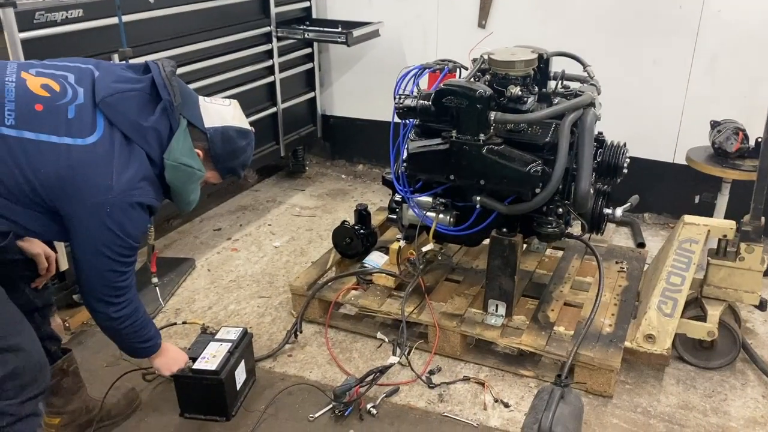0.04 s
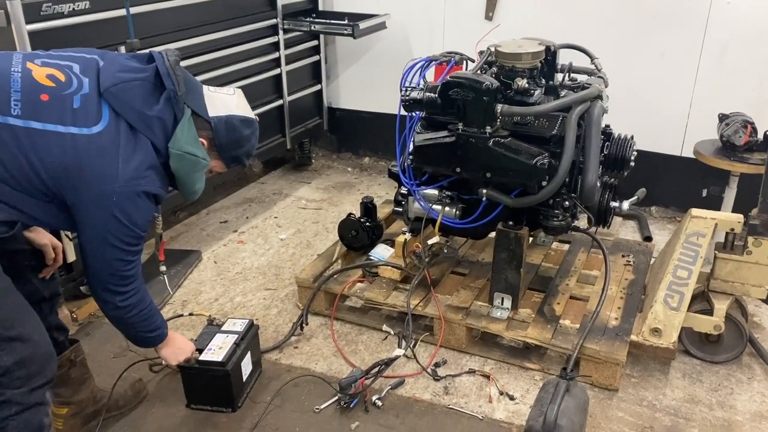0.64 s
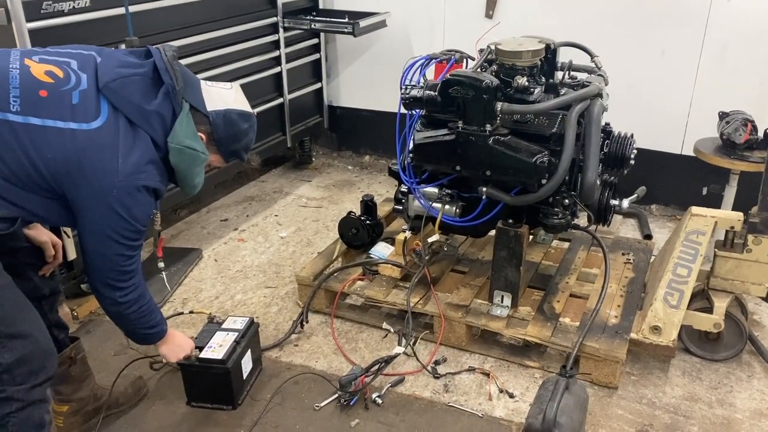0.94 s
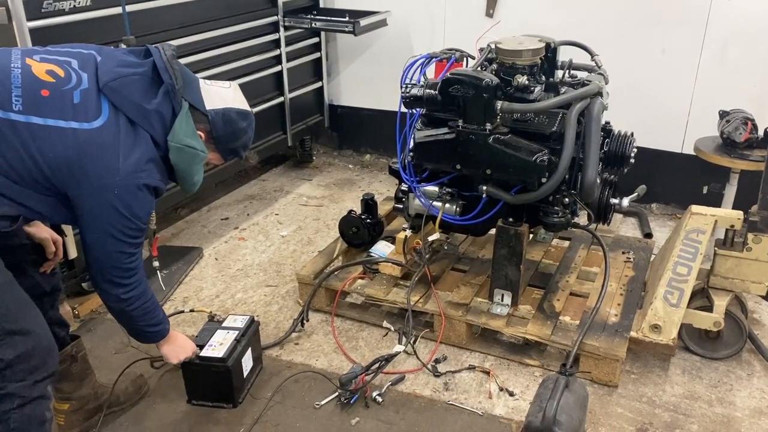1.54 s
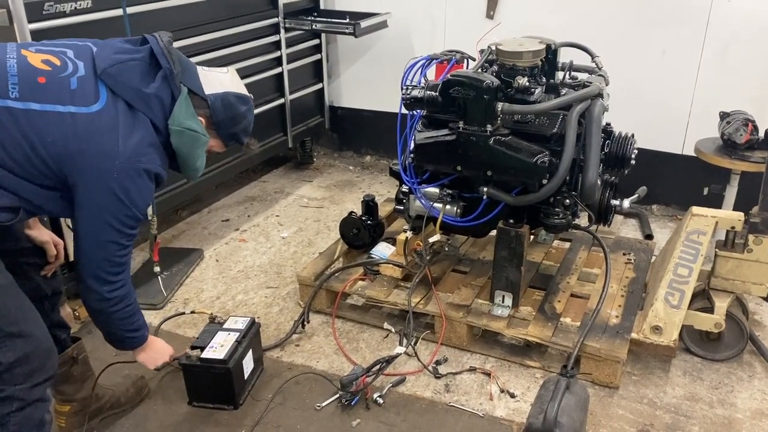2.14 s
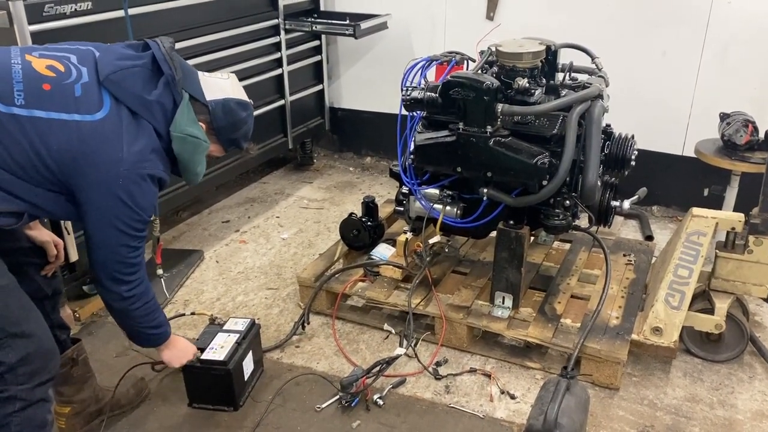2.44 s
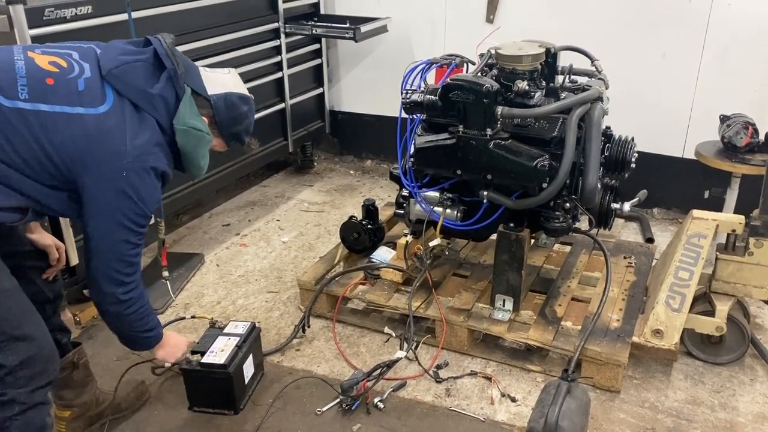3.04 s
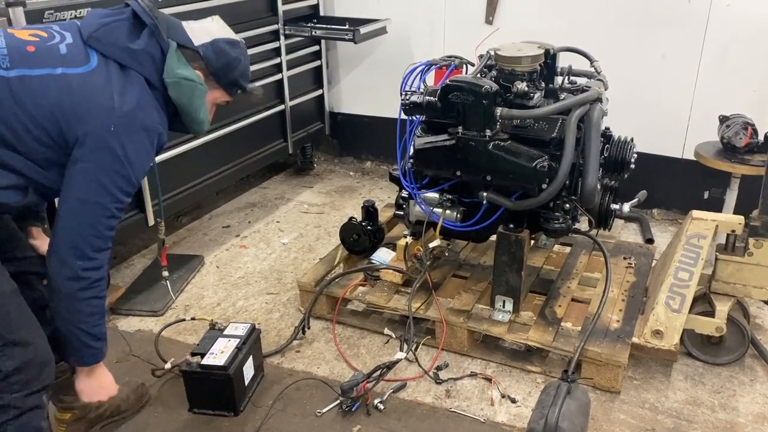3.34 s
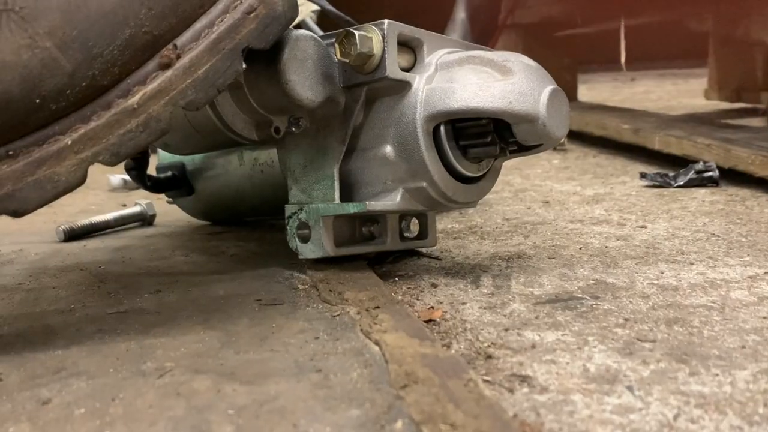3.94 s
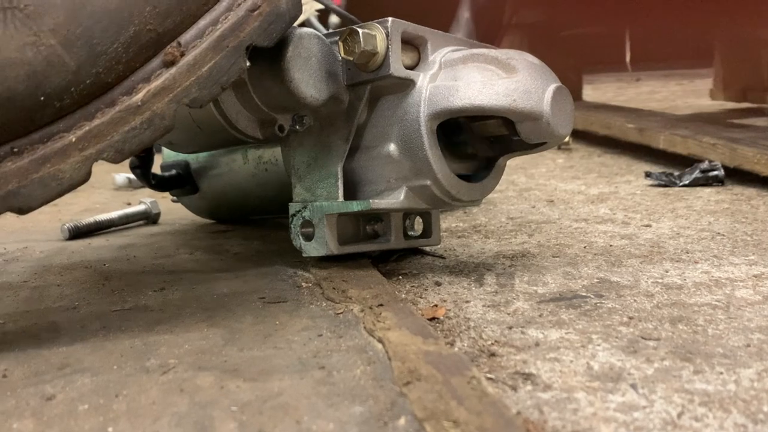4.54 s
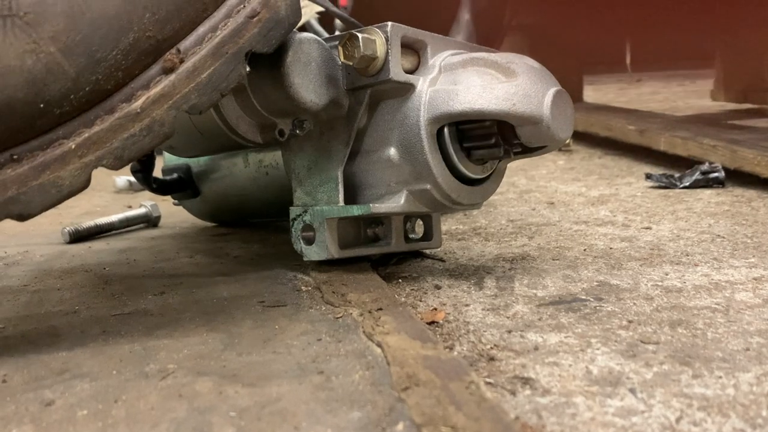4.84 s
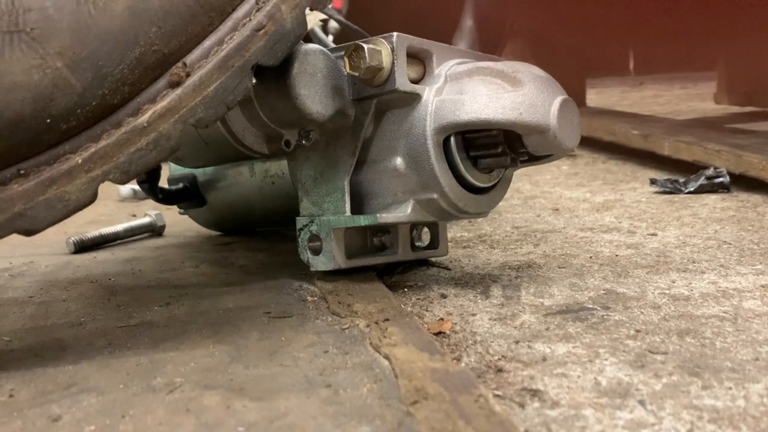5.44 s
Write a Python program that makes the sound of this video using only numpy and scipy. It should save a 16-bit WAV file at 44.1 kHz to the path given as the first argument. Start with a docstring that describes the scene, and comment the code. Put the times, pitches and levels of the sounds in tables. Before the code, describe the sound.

Ringing metal clicks from an engine that will not turn over, followed by close, sharp steel clacks of a starter with brief whirrs.

```python
"""A workshop, microphones a few steps from a boat engine whose starter is jumped from a battery.
Three times the lead sparks on the post, the solenoid slams in, the lead sparks again and it drops out;
block and room ring, but nothing turns. A sleeve swishes and the lead is put down with soft bumps.
Then, close by on the concrete floor, a loose starter: three times its pinion shoots out with a steel
clack and whirrs briefly; the first two times it snaps back on its spring. The room rumbles faintly."""
import sys
import numpy as np
from scipy import signal
from scipy.fft import rfft, irfft, next_fast_len
from scipy.io import wavfile
from scipy.ndimage import uniform_filter1d

SR = 44100
rng = np.random.default_rng(int(sys.argv[2]) if len(sys.argv) > 2 else 0)


def inscribe(sig):
    """Save sig as 16-bit PCM at rate SR to the path in sys.argv[1].

    A 1-D sig is mono; a 2-D sig holds one channel per row.
    Samples are clipped to [-1, 1] before scaling.
    """
    pcm = np.round(np.clip(np.atleast_2d(sig).T, -1, 1) * 32767)
    wavfile.write(sys.argv[1], SR, pcm.astype(np.int16))


N = 247047
T = np.arange(SR) / SR  # the second that follows a blow

# the solenoid on the engine slams in and drops out: time_s, level_db, spark_db
PULL_IN = [(.1150, -15, -32), (1.31, -15.5, -33.5), (2.564, -16.5, -30.5)]
DROP_OUT = [(0.6297, -22, -38), (1.7995, -22.5, -31.5), (2.9318, -22.5, -27.5)]
# the loose starter's pinion hits its stop: time_s, travel_s, level_db, lever_db
THROWS = [(3.8126, .0218, -2, -10), (4.579, .0212, -3.5, -8.5), (5.3237, .0234, -4, -14)]
# the pinion snaps back after the first two throws: time_s, level_db
RETURNS = [(4.193, -10.5), (4.9207, -11.5)]
# spectrum of the starter knocking on concrete: freq_hz, level_db
CONCRETE = [(20, -36), (50, 0), (110, -3), (230, -2.5), (560, -0.5), (950, 0), (1300, -16.5), (1800, -11),
            (3000, -19), (4600, -6), (7000, -18), (10000, -7), (15000, -42.5)]
# how alike the two microphones hear far and near sounds: freq_hz, correlation
ALIKE_FAR = [(100, 0.91), (300, .7), (600, 0), (1200, 0), (2500, .35), (5000, 0.21), (12000, 0.025)]
ALIKE_NEAR = [(100, 1), (900, 0.73), (2500, 0.08), (5000, 0.13), (9000, 0.14), (13000, 0.48)]


def mounted_starter():
    """The starter on the engine and its battery lead, a few steps off and slightly to the right."""
    return (pull_in() + drop_out() + lead_sparks() + lead_bumps()) * amp([[-.5], [.5]])


def pull_in():
    """The solenoid slams its plunger home and the engine rings."""
    # spectra of the crack and the ring: freq_hz, level_db
    crack = [(30, -32.5), (100, -21), (700, -14.5), (1100, -10.5), (1550, -3), (2600, -2), (3200, -11.5),
             (4500, -14.5), (7500, -15), (11400, -19), (13500, -20), (16000, -33)]
    ring = [(25, -41), (70, -27.5), (180, -28.5), (245, -8), (350, -14), (490, -4), (720, -11.5),
            (1100, 1.5), (1700, -2.5), (2600, -4.5), (3200, -16.5), (3650, -8), (4400, -13.5),
            (7500, -17.5), (12000, -19), (15500, -36.5)]
    # narrow resonances in the ring: pitch_hz, width_hz, lift_db
    peaks = [(1100, 35, 3), (2110, 80, 0)]
    return engine_blows(PULL_IN, crack, ring, peaks, crack_db=8.5, rise_s=.0018, hold_s=.002,
                        t60_s=.05, swell_s=.0077, modes_db=-8.5, tilt_db=1.5)


def drop_out(recoil_s=.0117, recoil_db=-14.5):
    """The plunger drops back with a shorter crack; the recoil thuds into the pallet."""
    # spectra of the crack, the ring and the pallet's thud: freq_hz, level_db
    crack = [(100, -15.5), (450, -26.5), (950, -1.5), (1300, -14), (2400, 2), (3000, -14.5), (7500, -12),
             (9300, -3), (13300, -3), (15500, -17)]
    ring = [(25, -36), (60, -15.5), (120, -4), (180, -11), (265, 7.5), (420, -11.5), (750, -5.5),
            (1060, 2.5), (1400, -10.5), (2500, -6.5), (3250, -22), (4300, -14), (8000, -15.5),
            (11000, -2.5), (15000, -28.5)]
    pallet = [(20, -52), (50, -33.5), (85, -9.5), (125, -2), (180, -11.5), (280, -8.5), (400, -25),
              (1000, -43), (4000, -82)]
    # narrow resonances in the ring: pitch_hz, width_hz, lift_db
    peaks = [(1100, 40, 3), (4900, 160, 5)]
    blows = engine_blows(DROP_OUT, crack, ring, peaks, crack_db=7, rise_s=.0021, hold_s=.0043,
                         t60_s=.019, swell_s=.0044, modes_db=-7, tilt_db=-.8)
    recoils = [(s + recoil_s, db + recoil_db) for s, db, _ in DROP_OUT]
    return blows + taps(recoils, pallet, ALIKE_NEAR, hold_s=.011, t60_s=.24)


def engine_blows(blows, crack, ring, peaks, crack_db, rise_s, hold_s, t60_s, swell_s, modes_db, tilt_db):
    """The plunger cracks against its stop; block and room swell up behind it and ring out."""
    # damped resonances of the solenoid case: pitch_hz, width_hz, lift_db
    case = [(1490, 96, 12), (2250, 150, -6.5), (2640, 180, 1.5), (3730, 250, 6.5), (10300, 100, -1),
            (13200, 63, 1.5)]
    out = np.zeros((2, N))
    early = 1 + .56 * np.exp(-T / .029)  # floor and near walls answer first
    for s, db, _ in blows:
        add(out, s, amp(db + crack_db) * burst(crack, ALIKE_FAR, rise_s, hold_s, t60_s, case))
        body = noise(ring, ALIKE_FAR, peaks) * early + amp(modes_db) * block_ring(tilt_db)
        add(out, s, amp(db) * room_decay(body) * (1 - np.exp(-T / swell_s)))
    return out


def block_ring(tilt_db):
    """The block's modes, struck at new strengths each time; tilt is per octave."""
    # modes of the engine block and its brackets: pitch_hz, level_db
    modes = [(250, -2), (278, -5.5), (308, -11.5), (388, -12), (425, -15), (515, -10), (925, -5.5),
             (1056, -7), (1131, 0.5), (1160, -4.5), (1212, -10), (1300, -13), (1464, -9.5), (1590, -9.5),
             (1688, -11), (1750, -11.5), (2090, -13), (2283, -10.5), (2370, -11), (2585, -11.5),
             (2725, -17), (3613, -20)]
    hz, db = np.transpose(modes)[:, :, None]
    scatter, phase, spread = rng.standard_normal((3, len(modes), 1))
    strength = amp(db + 1.5 * scatter + tilt_db * np.log2(hz / 1000))
    angle = 2 * np.pi * (hz * T + phase)
    apart = spread * np.minimum(hz / 1500, 1)  # high modes differ in phase between the microphones
    return np.array([(strength * np.sin(angle + side * apart)).sum(0) for side in (-1, 1)])


def loose_starter(lag_s=.00011, room_db=-16.5):
    """The strokes on the floor, close up and slightly to the left, with a little of the room."""
    strokes = pinion_out() + pinion_back()
    right = np.roll(strokes[1], round(lag_s * SR))  # the left microphone hears them first
    direct = np.array([strokes[0], right])
    return (direct + amp(room_db) * room(strokes)) * amp([[.5], [-.5]])


def pinion_out():
    """The plunger starts, jolts the lever and seats; the pinion hits its stop and rocks the starter."""
    stops = [(s, db) for s, _, db, _ in THROWS]
    starts = [(s - travel_s, db - 12.5) for s, travel_s, db, _ in THROWS]
    levers = [(s - .0107, db) for s, _, _, db in THROWS]
    seats = shifted(stops, -.0063, -11.5)
    seat_jolts = shifted(stops, -.002986, -11.5)  # the housing takes up the seating blow
    out = clacks(starts, knock_db=-6.5, slide_db=-17.5, slide_s=.0034)
    out += clacks(seats, knock_db=3.5, slide_db=-14, slide_s=.0083)
    out += jolts(levers + seat_jolts + stops)
    return out + taps(shifted(stops, gain_db=-19), CONCRETE, ALIKE_NEAR, hold_s=.00063, t60_s=.029)


def pinion_back(twang_t60_s=.61):
    """The solenoid lets go, the spring snaps the pinion home and shivers; the starter tips and lands."""
    # light clicks of letting go: time_s, level_db
    clicks = [(4.1617, -35), (4.1715, -22.5), (4.9025, -32)]
    # resonances of the mounting flange and the spring: pitch_hz, width_hz, lift_db
    flange = [(1350, 350, 13), (4900, 1000, 8)]
    spring = [(614, 43, 29.5), (910, 50, 23.5), (2280, 130, 18.5), (4230, 180, 18.5)]
    # spectrum of the spring's shiver: freq_hz, level_db
    shiver = [(20, -45), (100, -16.5), (400, -3.5), (1500, 3.5), (6000, 3.5), (10000, -9.5), (13000, -15.5),
              (15500, -26)]
    rocks = shifted(RETURNS, .0042, -7.5)
    landings = shifted(RETURNS, .051, -8.5)
    out = clacks(clicks, knock_db=-6.5, slide_db=-19.5, slide_s=.007)
    out += clacks(RETURNS, knock_db=-10.5, slide_db=-11.5, slide_s=.01)
    out += jolts(shifted(RETURNS, .003624, -6), tilt_db=-11.5)
    out += taps(rocks, CONCRETE, ALIKE_NEAR, hold_s=.0006, t60_s=.066)
    out += taps(landings, CONCRETE, ALIKE_NEAR, hold_s=.0013, t60_s=.027, peaks=flange)
    for s, db in shifted(RETURNS, .004, -25):
        add(out, s, amp(db) * noise(shiver, ALIKE_FAR, spring) * amp(-60 * T / twang_t60_s))
    return out


def clacks(contacts, knock_db, slide_db, slide_s):
    """The plunger's scrape swells until steel meets steel and knocks the housing."""
    # spectra of the steel contact and the housing's knock: freq_hz, level_db
    steel = [(1000, -20), (3000, -23), (6000, -25.5), (7300, -8), (9000, 8.5), (12000, -4), (14000, 2.5),
             (16000, -12)]
    knock = [(20, -30), (50, -11.5), (105, -2.5), (240, -35), (560, 2), (740, -5.5), (950, 9), (1300, -21),
             (2200, -2), (3700, -5), (5800, -7), (9000, -20)]
    # resonances of lever and pinion: pitch_hz, width_hz, lift_db
    lever = [(3400, 600, -3), (5600, 500, -3.5), (7400, 420, 2.5), (8500, 320, -9.5), (13400, 440, 5.5)]
    knocks = shifted(contacts, gain_db=knock_db)
    out = taps(contacts, steel, ALIKE_NEAR, hold_s=.002, t60_s=.026, peaks=lever)
    out += taps(knocks, knock, ALIKE_NEAR, hold_s=.004, t60_s=.049)
    t = T[:SR // 5]
    for s, db in knocks:
        scrape = noise(knock, ALIKE_NEAR, size=len(t)) * np.exp(-t[::-1] / slide_s)
        add(out, s - t[-1], amp(db + slide_db) * scrape)
    return out


def jolts(contacts, tilt_db=0):
    """The hollow nose housing rings briefly; tilt is per octave."""
    # modes of the housing: pitch_hz, level_db, t60_s
    modes = [(400, -24, 0.041), (547, -11, .035), (590.6, -11, 0.045), (900, -8.5, 0.017), (915, 0, 0.031),
             (1134, -3, 0.016), (1305, -10.5, .016), (1940, -6.5, 0.01), (2300, -14, 0.032),
             (2630, -13, 0.012)]
    out, t = np.zeros((2, N)), T[:SR // 5]
    for s, db in contacts:
        ring = 0
        for hz, level_db, t60_s in modes:
            envelope = amp(level_db + tilt_db * np.log2(hz / 1000) - 60 * t / t60_s)
            ring += envelope * np.sin(2 * np.pi * hz * t + rng.normal(0, .34, (2, 1)))
        add(out, s, amp(db) * ring * (1 - np.exp(-t / .00067)))
    return out


def armature(mesh_hz=1090, nose_hz=930, width_hz=40, rasp_hz=2950, shaft_hz=1318,
             fade_db_per_s=24, brake_s=.23, brake_db_per_s=60.5):
    """Kicked by each throw, it coasts: brushes hiss, gear whine sinks through the housing's resonance."""
    # spectrum of the brushes: freq_hz, level_db
    brushes = [(40, -37), (100, -9.5), (190, -20.5), (250, 2), (320, -28.5), (420, -10.5), (540, -3.5),
               (680, 0), (920, 1), (1500, -17), (2650, -0.5), (3250, -15), (4200, -9), (9000, -27.5),
               (15000, -45)]
    out = np.zeros((2, N))
    speed = np.exp(-.97 * T)  # share of the speed just after the kick
    onset = 1 - np.exp(-T / .012)
    fade = amp(-fade_db_per_s * T - brake_db_per_s * np.maximum(T - brake_s, 0))
    resonance = 1 / np.hypot(1, 2 * (mesh_hz * speed - nose_hz) / width_hz)
    for s, _, db, _ in THROWS:
        angle = 2 * np.pi * np.cumsum(speed * (1 + .054 * flutter(size=90))) / SR
        whine = resonance * np.sin(mesh_hz * angle) * (1 + .5 * flutter(size=300))
        rasp = np.sin(rasp_hz * angle) * flutter(size=150)  # the dry bearing sinks in pitch too
        whirr = (noise(brushes, ALIKE_FAR) + amp(4) * whine + amp(-4) * rasp) * fade
        held_s = min([back - s for back, _ in RETURNS if back > s], default=1)
        gate = np.clip((held_s - T) / .015, 0, 1)  # the shaft rings while the pinion is out
        shaft = amp(-15 - 20 * T) * np.sin(2 * np.pi * shaft_hz * T) * gate
        add(out, s + .003, amp(db - 38) * (whirr + shaft) * onset)
    return out


def lead_sparks(pull_delay_s=.0148, drop_delay_s=.012):
    """The lead spits on the battery post just before each plunger move, heard mostly off the walls."""
    # a spark as the lead slips: time_s, level_db
    slips = [(1.756, -35.5)]
    # spectrum of a spark: freq_hz, level_db
    colour = [(120, -34), (200, -3.5), (722, -10), (1650, 2), (3560, -15.5), (11300, -4.5), (16000, -25)]
    makes = [(s - pull_delay_s, db) for s, _, db in PULL_IN]
    breaks = [(s - drop_delay_s, db) for s, _, db in DROP_OUT]
    sparks = taps(makes + breaks + slips, colour, ALIKE_FAR, hold_s=.00039, t60_s=.018)
    return sparks + amp(12.5) * room(sparks)


def lead_bumps():
    """The lead is put down softly."""
    # its contacts: time_s, level_db
    bumps = [(1.075, -57), (3.387, -52.5), (3.434, -49), (3.443, -55)]
    # their dull spectrum: freq_hz, level_db
    colour = [(30, -25), (80, 0), (160, -2.5), (300, -13.5), (550, -20), (750, -15), (1200, -42),
              (3000, -50), (6000, -62)]
    return taps(bumps, colour, ALIKE_NEAR, hold_s=.0047, t60_s=.1)


def sleeve():
    """Cloth brushes on cloth, swelling and fading with each move."""
    # arm moves: start_s, end_s, level_db
    swishes = [(2.236, 2.516, -77.5), (3.124, 3.618, -69.5)]
    # spectrum of the cloth: freq_hz, level_db
    cloth = [(500, -30), (1500, 2), (5000, -0.5), (10000, -0.5), (13000, 0), (16000, -27)]
    out = np.zeros((2, N))
    for start_s, end_s, db in swishes:
        n = round((end_s - start_s) * SR)
        add(out, start_s, amp(db) * noise(cloth, ALIKE_FAR, size=n) * np.hanning(n))
    return out


def room(x):
    """The workshop's walls return a sound as a diffuse tail."""
    # spectrum of the reflections: freq_hz, level_db
    walls = [(100, -1), (250, 0), (800, -13), (1500, -3.5), (2400, -0.5), (4300, -1.5), (7000, 0),
             (9500, -0.5), (13000, -3.5), (15500, -11)]
    tail = room_decay(noise(walls, ALIKE_FAR)) * (1 - np.exp(-T / .0014))
    return signal.fftconvolve(x.mean(0)[None], tail / np.linalg.norm(tail[0]), axes=1)[:, :N]


def room_decay(x):
    """Each frequency dies away at the workshop's own speed."""
    # reverberation times: freq_hz, t60_s
    decay_times = [(100, 0.47), (260, 0.67), (700, 0.6), (1130, 0.55), (1840, 0.62), (4850, 0.55),
                   (11000, 0.37), (15000, 0.18)]
    hz, t, spectra = signal.stft(x, SR, nperseg=256)
    decay = amp(-60 * t / along(decay_times, hz)[:, None])
    return signal.istft(spectra * decay, SR, nperseg=256)[1][:, :SR]


def room_tone():
    """The workshop's faint, steady rumble."""
    # its spectrum: freq_hz, level_db
    rumble = [(12, -26), (28, -13.5), (50, -2.5), (90, -6), (170, -13.5), (250, -16.5), (400, -22),
              (900, -29), (2500, -43), (7000, -45), (12000, -45), (16000, -68.5)]
    return amp(-63.5) * noise(rumble, ALIKE_FAR, size=N)


def taps(contacts, colour, alike, hold_s, t60_s, peaks=()):
    """Short contacts of one colour."""
    out = np.zeros((2, N))
    for s, db in contacts:
        add(out, s, amp(db) * burst(colour, alike, .00095, hold_s, t60_s, peaks))
    return out


def burst(colour, alike, rise_s, hold_s, t60_s, peaks):
    """A blow on many close, heavily damped modes: it swells, holds a moment and dies."""
    t = T[:SR // 5]
    shape = (1 - np.exp(-t / rise_s)) * amp(-60 * np.maximum(t - hold_s, 0) / t60_s)
    return unit(noise(colour, alike, peaks, size=len(t)) * shape) * np.sqrt(np.mean(shape ** 2))


def noise(colour, alike, peaks=(), size=SR):
    """Coloured stereo noise of rms 1, with resonances standing out of it."""
    n = next_fast_len(size)
    hz = np.fft.rfftfreq(n, 1 / SR)
    peak_power = sum(amp(db) ** 2 / (1 + (2 * (hz - centre) / width) ** 2) for centre, width, db in peaks)
    spread = np.arccos(np.clip(along(alike, hz), -1, 1)) / 2
    gain = amp(along(colour, hz)) * np.sqrt(1 + peak_power) * [np.cos(spread), np.sin(spread)]
    mid, side = irfft(rfft(rng.standard_normal((2, n))) * gain, n)[:, :size]
    return unit(np.array([mid + side, mid - side]))


def flutter(size):
    """A second of random wavering of rms 1, smooth over size samples."""
    return unit(uniform_filter1d(rng.standard_normal(SR), size=size))


def shifted(contacts, delay_s=0, gain_db=0):
    """The same contacts, moved in time and level."""
    return [(s + delay_s, db + gain_db) for s, db in contacts]


def add(track, s, sound):
    """Mix a sound into the track from time s on."""
    part = track[:, max(round(s * SR), 0):][:, :sound.shape[-1]]
    part += sound[..., :part.shape[1]]


def along(points, hz):
    """A curve over frequency, read on a log axis."""
    freqs, values = np.transpose(points)
    return np.interp(np.log(hz + 1), np.log(freqs + 1), values)


def amp(db):
    """Decibels to gain."""
    return 10 ** (np.asarray(db) / 20)


def unit(x):
    """Scaled to rms 1."""
    return x / np.sqrt(np.mean(x ** 2) + 1e-20)


def scene():
    """The far starter, then the close one, over the workshop's rumble."""
    return mounted_starter() + loose_starter() + armature() + sleeve() + room_tone()


def record(dry, top_hz=16000):
    """The loudest peaks are rounded off and the highest treble is cut."""
    rounded = dry / (1 + np.abs(dry) ** 8) ** (1 / 8)
    return signal.sosfiltfilt(signal.butter(10, top_hz, fs=SR, output="sos"), rounded)


dry = scene()
out = record(dry)
inscribe(out)
```